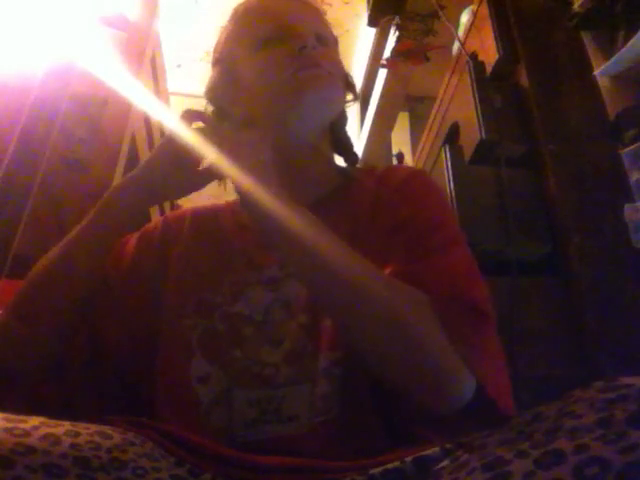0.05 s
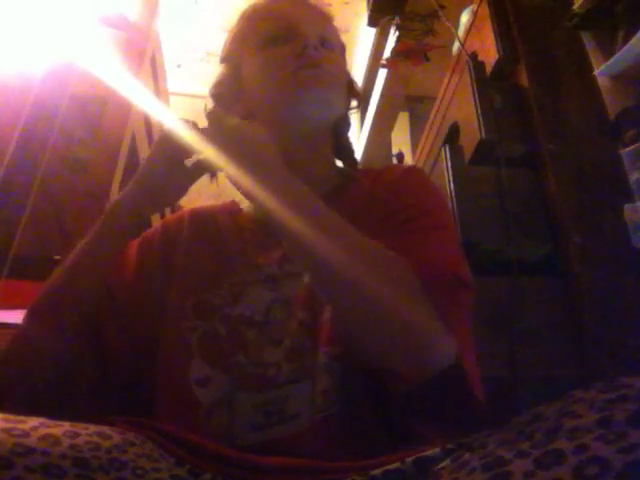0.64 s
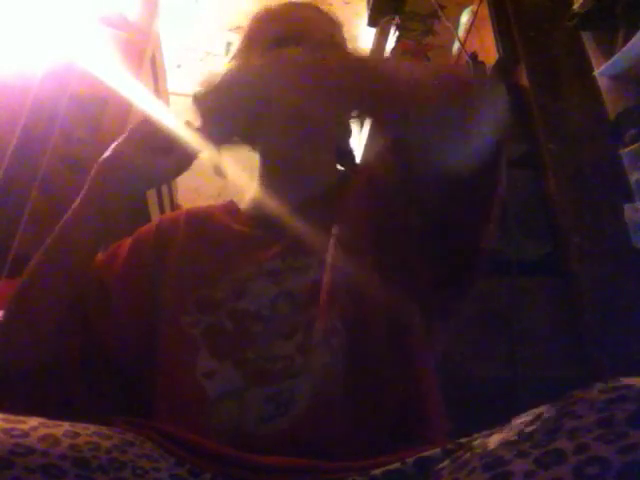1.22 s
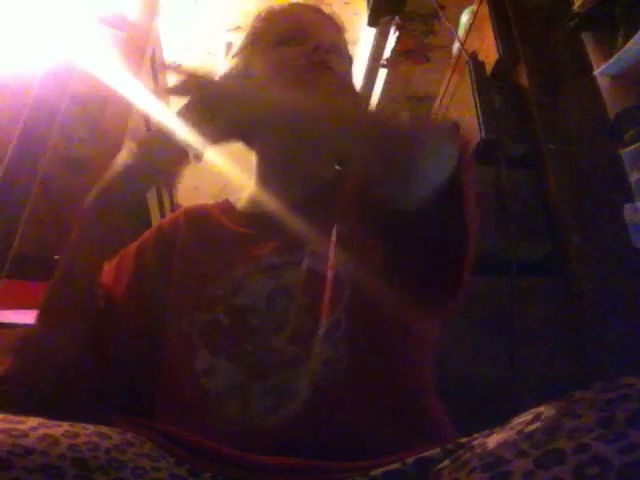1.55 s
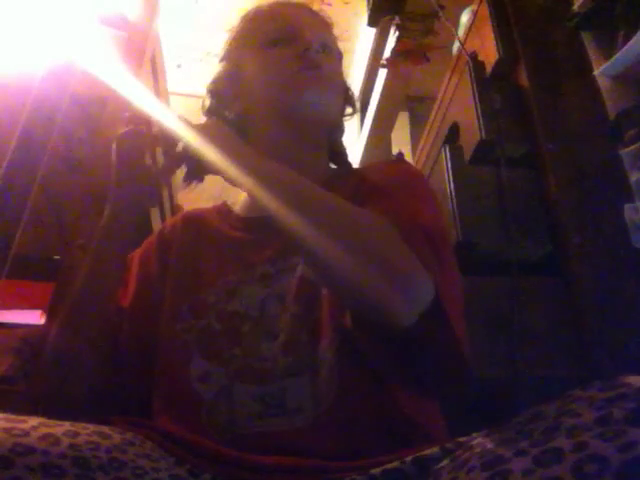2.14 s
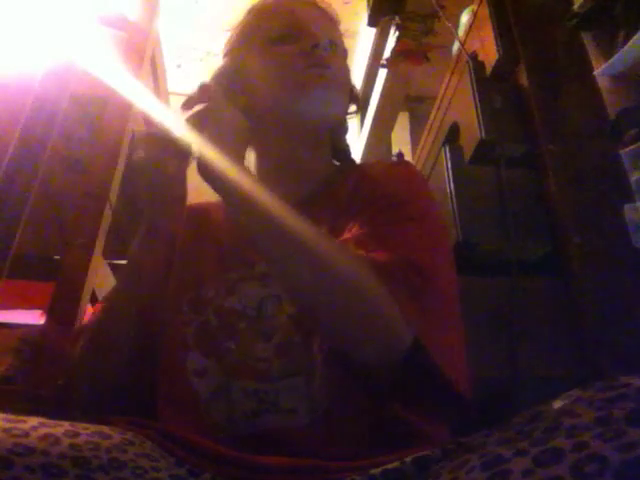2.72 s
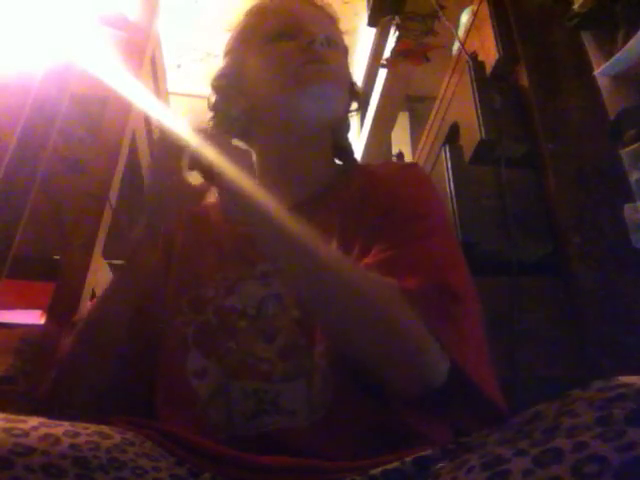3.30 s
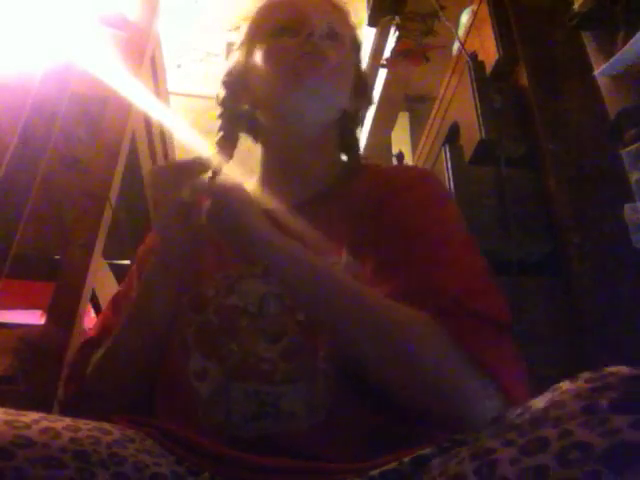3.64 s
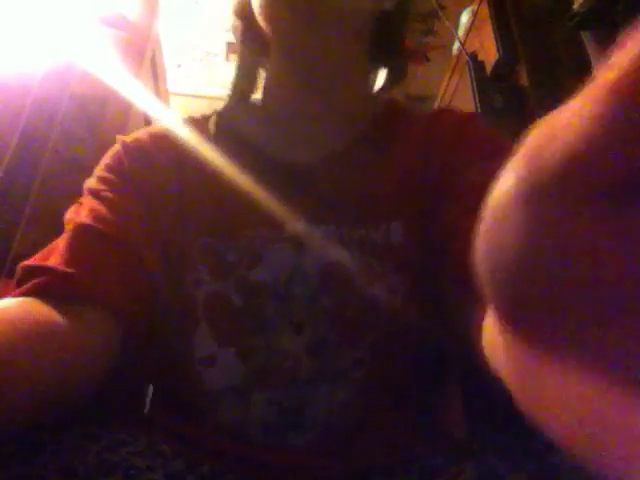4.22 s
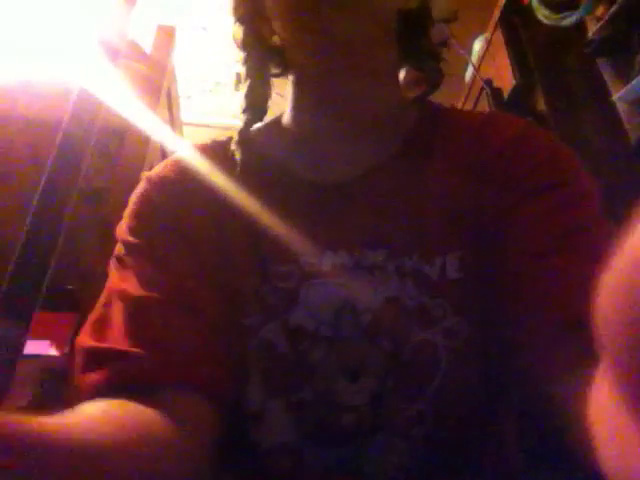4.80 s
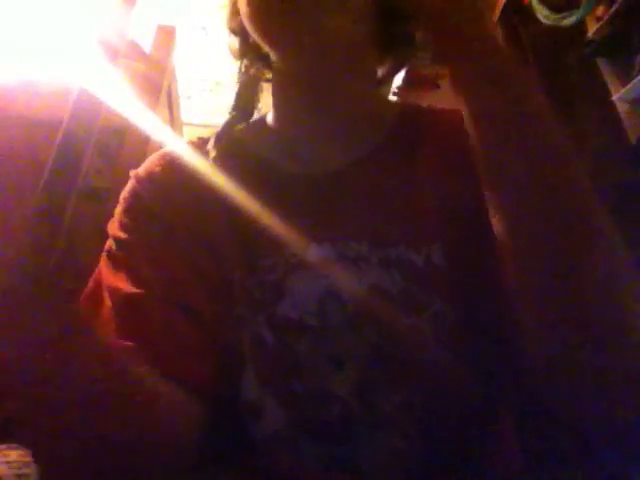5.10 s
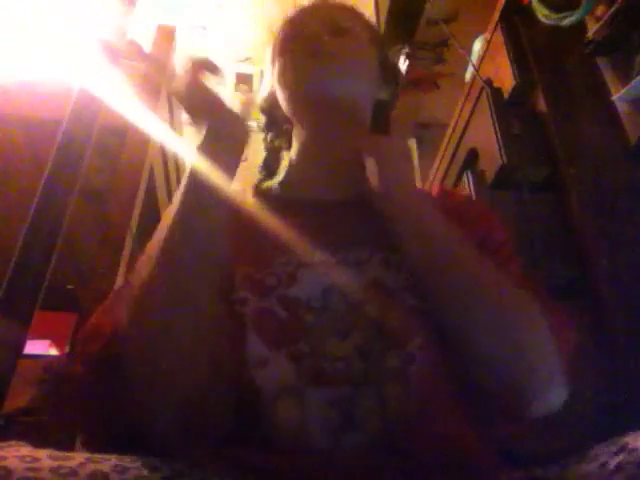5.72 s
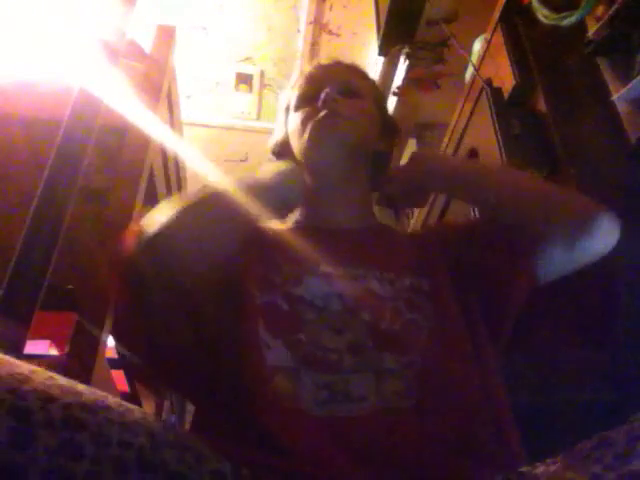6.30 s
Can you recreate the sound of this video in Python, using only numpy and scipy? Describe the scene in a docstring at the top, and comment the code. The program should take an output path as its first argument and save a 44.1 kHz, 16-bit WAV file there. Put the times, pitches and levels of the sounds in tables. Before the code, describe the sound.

Fingers softly rub and pluck hair over a fan's low hum, and a sleeve drags across the microphone with a few bumps.

```python
"""A fan hums in a quiet room while, close to a small microphone, fingers rub and pluck at hair, braiding it.
Skin slips on the strands in short, soft strokes, and single hairs snap past a fingernail.
About four seconds in, an arm reaches past the microphone: the sleeve drags over the casing,
which rings with a few bumps and judders as the arm draws back.
Then the hands slide into the hair again with a soft hiss."""
import sys
import numpy as np
from scipy import signal
from scipy.fft import rfft, irfft, next_fast_len
from scipy.io import wavfile

SR = 44100
rng = np.random.default_rng(int(sys.argv[2]) if len(sys.argv) > 2 else 0)


def generate_wav(sig):
    """Save sig (samples, or channels by samples) to the path in sys.argv[1] as 16-bit PCM at SR."""
    pcm = np.round(np.clip(np.atleast_2d(sig).T, -1, 1) * 32767).astype(np.int16)
    wavfile.write(sys.argv[1], SR, pcm)


N = 288850
TIME = np.arange(N) / SR


def from_db(db):
    """Decibels to gain."""
    return 10 ** (np.asarray(db) / 20)


def rms_one(x):
    """Scale to an rms of one."""
    return x / np.sqrt(np.mean(x ** 2) + 1e-20)


def drift(hz):
    """A slow random wander, mostly below the given rate, with a spread of about one."""
    step, settle = 40, 2000
    pole = np.exp(-2 * np.pi * hz * step / SR)
    noise = rng.standard_normal(N // step + settle + 2)
    slow = signal.lfilter([1], [1, -2 * pole, pole * pole], noise)[settle:]
    return np.interp(np.arange(N) / step, np.arange(len(slow)), rms_one(slow))


def colour(x, spectrum):
    """Shape x by (Hz, relative dB) points, falling away below the first; rms one."""
    hz, db = np.transpose(spectrum)
    size = next_fast_len(N)
    f = np.maximum(np.arange(size // 2 + 1) * SR / size, 1)
    gain = from_db(np.interp(np.log(f), np.log(hz), db)) * np.minimum(f / hz[0], 1) ** 2
    return rms_one(irfft(rfft(x, size) * gain, size)[:N])


def band(x, hz, octaves, skirt_db=-20):
    """A band of x around a centre, with soft skirts."""
    edges = hz * 2 ** (octaves * np.array([-.5, .5]))
    core = signal.sosfilt(signal.butter(2, edges, "band", fs=SR, output="sos"), x + 1e-18)
    skirt = signal.sosfilt(signal.butter(1, edges, "band", fs=SR, output="sos"), x + 1e-18)
    return core + from_db(skirt_db) * skirt


def friction(per_s, spread_db):
    """Countless tiny slips of uneven size; rms one."""
    sizes = from_db(spread_db * np.minimum(rng.exponential(1, N), 4))
    return rms_one(sizes * rng.standard_normal(N) * (rng.random(N) < per_s / SR))


def stroke(start, length):
    """Pressure in one stroke: it rises to one in a quarter of the length and relaxes slowly."""
    span = slice(max(int(start * SR), 0), min(int((start + 3 * length) * SR) + 2, N))
    progress = np.maximum(TIME[span] - start, 0) / (length / 4)
    pressure = np.zeros(N)
    pressure[span] = progress * np.exp(1 - progress)
    return pressure


def stroked(sound, start, db, length):
    """One stroke's worth of a sound, its rms cresting near the given level."""
    pressure = stroke(start, length)
    return from_db(db) * np.sqrt(np.mean(pressure ** 2)) * rms_one(pressure * sound)


def gesture(start, attack, hold, release):
    """A movement that gathers speed, holds it and comes to rest; times in seconds, height one."""
    return np.interp(TIME, start + np.cumsum([0, attack, hold, release]), [0, 1, 1, 0]) ** 1.5


def ring(x, hz, t60):
    """One resonance, struck by x; a small body radiates no deep bass."""
    pole = np.exp(-np.log(1000) / (t60 * SR))
    angle = 2 * np.pi * hz / SR
    return signal.lfilter([0, 1, -1], [1, -2 * pole * np.cos(angle), pole * pole], x + 1e-18)


def fan(air_db=-58, wander_rad=.18):
    """The fan motor hums at wavering mains harmonics over a low rush of air."""
    # Each row: frequency in Hz, unshaded rms level in dB, waver in dB.
    harmonics = [(123.2, -67, 1), (243, -76.5, 5), (359.6, -56, .5), (478.6, -67, 1.5)]
    # The body shades the hum as it leans forward. Each row: time in seconds, gain in dB.
    shading = [(4.2, -2), (5.0, -4), (5.7, -3.5), (6.2, 0)]
    # Moving air in the room. Each row: frequency in Hz, relative level in dB.
    air_spectrum = [(25, -24), (55, -18.5), (85, -7.5), (105, -6.5), (125, -2), (150, 0.5), (200, 1.5),
                    (265, 1.5), (300, -6), (365, 0), (420, -10), (480, -6.5), (610, -10.5), (690, -17.5),
                    (1100, -21), (2000, -29.5), (8000, -53)]
    hum = np.zeros(N)
    for hz, db, waver_db in harmonics:
        amplitude = np.sqrt(2) * from_db(db + waver_db * drift(4.1))
        hum += amplitude * np.sin(2 * np.pi * (hz * TIME + rng.random()) + wander_rad * drift(2.8))
    shade = from_db(np.interp(TIME, *np.transpose(shading)))
    air = from_db(air_db + drift(5.3)) * colour(rng.standard_normal(N), air_spectrum)
    return hum * shade + air


def fingers(fidget_db=-73, fidget_swing_db=2.5):
    """Close to the microphone, skin slips on hair in a band of noise, narrow when a strand is taut."""
    # Rubs along a strand. Each row: start in seconds, crest in dB, length in seconds, centre in Hz.
    rub_strokes = [(-.015, -55.5, 0.057, 1170), (.288, -67.5, .052, 950), (0.556, -67.5, 0.094, 800),
                   (.70, -55, 0.077, 840), (0.815, -69, .1, 790), (1.283, -63.5, .035, 1500),
                   (1.77, -65, 0.063, 1100), (1.986, -68, .08, 930), (2.189, -60, 0.053, 855),
                   (2.537, -59, 0.07, 980), (2.866, -57.5, 0.062, 795), (2.981, -57.5, 0.052, 1100),
                   (3.26, -68.5, 0.042, 990), (3.665, -57.5, .085, 825), (3.965, -62, .12, 1080),
                   (4.169, -61, 0.033, 1430), (4.938, -61.5, 0.058, 1500), (5.676, -61.5, 0.11, 1120),
                   (5.923, -64, .07, 1020), (6.2, -66, 0.18, 800), (6.442, -59.5, 0.08, 1090)]
    # A taut strand scratches as it is pulled through. Each row: start in seconds, crest in dB.
    pulls = [(1.277, -66.5), (2.986, -61)]
    # Fingernails tick. Each row: start in seconds, crest in dB, centre in Hz.
    nail_ticks = [(3.871, -54, 840), (6.098, -54.5, 1090)]
    # Faint fidgeting, heard between strokes. Each row: frequency in Hz, relative level in dB.
    fidget_spectrum = [(600, -4), (1100, -4), (1600, -11), (2600, -17), (4000, -33), (9000, -44)]
    slips = friction(per_s=8000, spread_db=1.1)
    rubs = sum(stroked(band(slips, hz, octaves=1.14), start, db, length)
               for start, db, length, hz in rub_strokes)
    taut = band(slips, hz=2400, octaves=.45, skirt_db=0)
    scratches = sum(stroked(taut, start, db, length=.075) for start, db in pulls)
    ticks = sum(stroked(band(slips, hz, octaves=1.4), start, db, length=.0087)
                for start, db, hz in nail_ticks)
    fidget_gain = from_db(fidget_db + fidget_swing_db * drift(7.9))
    fidget = fidget_gain * colour(friction(3000, 1.3), fidget_spectrum)
    return rubs + scratches + ticks + fidget


def low_arm_swells(wander_rad=.7):
    """Soft, low swells, each on one note, come now and then, probably as the arms move."""
    # Each row: start in seconds, crest in dB, frequency in Hz.
    swells = [(.595, -55, 160), (.812, -53.5, 228), (1.02, -57.5, 121), (2.082, -58.5, 119),
              (2.412, -55, 121), (3.653, -60, 143)]
    out = np.zeros(N)
    for start, db, hz in swells:
        phase = 2 * np.pi * (hz * TIME + rng.random()) + wander_rad * drift(10)
        out += np.sqrt(2) * from_db(db) * stroke(start, length=.12) * np.sin(phase)
    return out


def hair(flutter_db=1.3, palm_db=-69):
    """Single hairs snap past a fingernail; sliding strands hiss over the duller rub of the palms."""
    # Little clusters of snaps. Each row: start in seconds, crest in dB, length in seconds.
    clusters = [(.93, -69.5, .083), (.968, -62.5, .018), (1.28, -70, .041), (1.537, -70, .031),
                (2.71, -64, .016), (2.78, -61.5, .02), (3.0, -70, .03), (3.218, -65, .028)]
    # Hair and cloth slide under the hands.
    # Each row: start in seconds, hiss level in dB, swell and hold in seconds.
    hand_slides = [(3.964, -60, 0.063, 0.11), (4.69, -65, 0.34, 0.074), (5.072, -55.5, .36, .18),
                   (5.946, -67.5, 0.29, 0.099)]
    # The bright tone of snaps and of slides. Each row: frequency in Hz, relative level in dB.
    snap_spectrum = [(1500, -27), (5000, -10), (8500, 2), (12000, 5), (16500, -8.5)]
    slide_spectrum = [(700, -14), (1500, -19), (3200, -14), (4200, -15.5), (5400, -6), (6600, -13),
                      (8000, -3), (10200, 2), (13000, -2.5), (16500, -4.5)]
    hiss = from_db(flutter_db * drift(37)) * colour(friction(25000, 1.7), slide_spectrum)
    palms = from_db(palm_db) * rms_one(band(friction(8000, .95), hz=1400, octaves=2.9))
    slides = sum(gesture(start, swell, hold, release=.11) * (from_db(db) * hiss + palms)
                 for start, db, swell, hold in hand_slides)
    snap_gain = sum(from_db(db) * stroke(start, length) for start, db, length in clusters)
    return slides + snap_gain * colour(friction(4000, 1.8), snap_spectrum)


def sleeve(rustle_db=-57, flutter_db=1.2, press_db_per_s=85):
    """Cloth rustles dully as the arm swings past, and drags loudly where it lies on the casing."""
    # The arm presses harder twice. Each row: time in seconds, level in dB, easing in dB per second.
    pushes = [(4.44, -37.5, 96), (4.562, -37, 63)]
    # Dragging cloth. Each row: frequency in Hz, relative level in dB.
    drag_spectrum = [(50, -28), (100, -14), (150, 9), (400, 9.5), (750, 7), (1300, 0), (2400, -1),
                     (4000, -2), (7000, -4.5), (9500, -.3), (12000, -3), (16500, -8.5)]
    swing = gesture(start=4.2, attack=.047, hold=.46, release=.28)
    cloth = rms_one(band(friction(20000, 2.0), hz=1360, octaves=2.37, skirt_db=-2))
    rustle = from_db(rustle_db) * swing * cloth
    contact = gesture(start=4.31, attack=.037, hold=.34, release=.21)
    push_db = np.max([db - np.maximum(press_db_per_s * (at - TIME), easing * (TIME - at))
                      for at, db, easing in pushes], axis=0)
    drag_gain = contact * from_db(push_db + flutter_db * drift(69))
    return rustle + drag_gain * colour(friction(18000, 2.8), drag_spectrum)


def scrapes_and_catches():
    """Skin scrapes briefly over the casing, and fibres catch on an edge with a sharp tick."""
    # Each row, in both: start in seconds, crest in dB, length in seconds.
    scrapes = [(4.4443, -36.5, 0.0083), (4.464, -41.5, 0.028), (4.55, -47, .014)]
    catches = [(4.432, -32, .0008), (4.447, -28, .0007), (4.548, -21, 0.00093), (4.564, -35, 0.024)]
    # Each row: frequency in Hz, relative level in dB.
    catch_spectrum = [(3000, -38), (5500, -8), (7500, 1.5), (12000, 5.0), (16500, -7)]
    skin = band(friction(8000, 1.7), hz=1870, octaves=1.9)
    crackle = colour(rng.standard_normal(N), catch_spectrum)
    return sum(stroked(skin, *row) for row in scrapes) + sum(stroked(crackle, *row) for row in catches)


def bumps(gain_db=-5.5, scatter_db=.8):
    """Bumps ring the casing; a soft contact leaves high modes quiet, and the resting arm damps the ring."""
    # Each row: time in seconds, relative level in dB, contact in seconds, share of the ring time left.
    knocks = [(4.4404, -27.5, 0.0023, .4), (4.466, -20, 0.0027, 0.31), (4.4775, -29, .0018, 0.35),
              (4.486, -30, .0034, 0.52), (4.493, -20, 0.0063, .35), (4.554, -23.5, 0.00073, 0.53),
              (4.5588, -31.5, 0.0022, 0.68), (4.5645, -21, 0.0014, 0.42), (4.5937, -32, 0.0023, .7),
              (4.6477, -23.5, 0.0026, .6), (4.6651, -32.5, 0.0024, 1.0)]
    # The casing's modes. Each row: frequency in Hz, relative level in dB, free t60 in seconds.
    modes = [(181, -15.5, 0.11), (277, 1.5, 0.11), (377, 0.5, 0.039), (450, 3, 0.12), (530, -13, .06),
             (650, -1, 0.066), (980, -19, .03)]
    scatter = rng.normal(0, scatter_db, (len(knocks), len(modes)))
    out = np.zeros(N)
    for (start, db, contact, ring_share), strays in zip(knocks, scatter):
        at = int(start * SR)
        push = signal.windows.hann(int(contact * SR) + 3)
        force = np.pad(push / push.sum(), (0, SR // 2))
        for (hz, mode_db, t60), stray_db in zip(modes, strays):
            gain = from_db(gain_db + db + mode_db + stray_db)
            out[at:at + len(force)] += gain * ring(force, hz, t60 * ring_share)
    return out


def thud():
    """The casing gives under the arm's weight with a deep thud."""
    rumble = band(rng.standard_normal(N), hz=60, octaves=2.2)
    return stroked(rumble, start=4.47, db=-57, length=.03)


def judder(start=4.556, every_s=.0285, first_db=-29.5, loss_db=2.4, slips=5):
    """The arm draws back in even, fading slips that keep one hollow resonance of the casing sounding."""
    hollow = ring(friction(4000, .85), hz=379, t60=.068)
    return sum(stroked(hollow, start + k * every_s, first_db - k * loss_db, length=.02)
               for k in range(slips))


def room(x, t60=.21, echoes=10):
    """Short feedback delays stand for the nearby walls; reflections only."""
    lags = (rng.uniform(.009, .04, echoes) * SR).astype(int)
    out = np.zeros(N)
    for k, lag in enumerate(lags):
        loop = x.copy()
        feedback = np.exp(-np.log(1000) * lag / SR / t60)
        for i in range(lag, N, lag):
            loop[i:i + lag] += feedback * loop[i - lag:i][:N - i]
        out += (loop - x) * (-1) ** k
    return out / np.sqrt(echoes)


def scene(room_db=-6):
    """Hands and sleeve sound in the room, over the fan; the casing reaches the microphone directly."""
    moves = fingers() + hair() + sleeve() + scrapes_and_catches()
    low_cut = signal.butter(2, 60, "high", fs=SR, output="sos")
    casing = signal.sosfilt(low_cut, bumps() + judder())
    return (moves + from_db(room_db) * room(moves) + casing + thud() + fan() + low_arm_swells())[None]


def record(dry, hiss_db=-67.5, cutoff_hz=17200):
    """One small microphone adds its own hiss; the top of the treble is cut steeply."""
    # Nearly white hiss. Each row: frequency in Hz, relative level in dB.
    hiss_spectrum = [(300, 0.5), (1500, 0.5), (3000, 2), (6000, 1), (10000, 1.5), (12500, -0.8), (15000, 0),
                     (17000, 0.4)]
    hiss = from_db(hiss_db) * colour(rng.standard_normal(N), hiss_spectrum)
    high_cut = signal.ellip(12, .1, 80, cutoff_hz, fs=SR, output="sos")
    return signal.sosfilt(high_cut, dry + hiss)


dry = scene()
out = record(dry)
generate_wav(out)
```